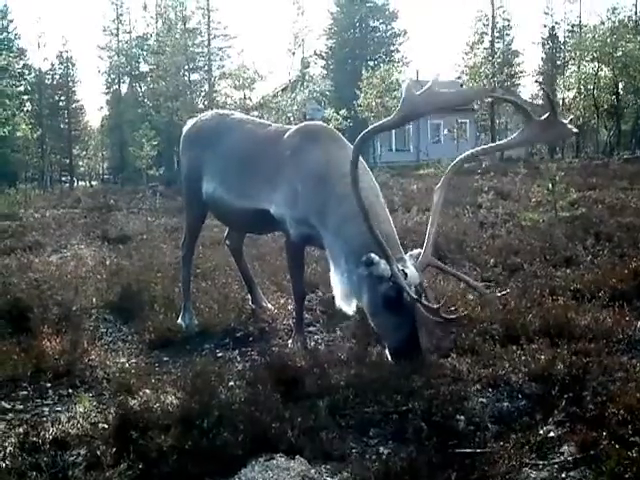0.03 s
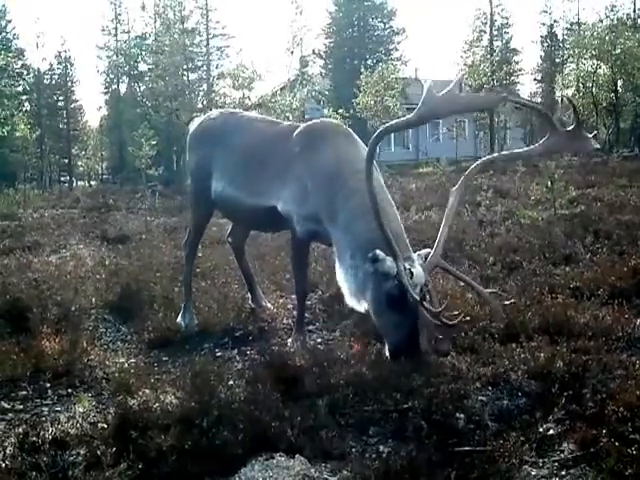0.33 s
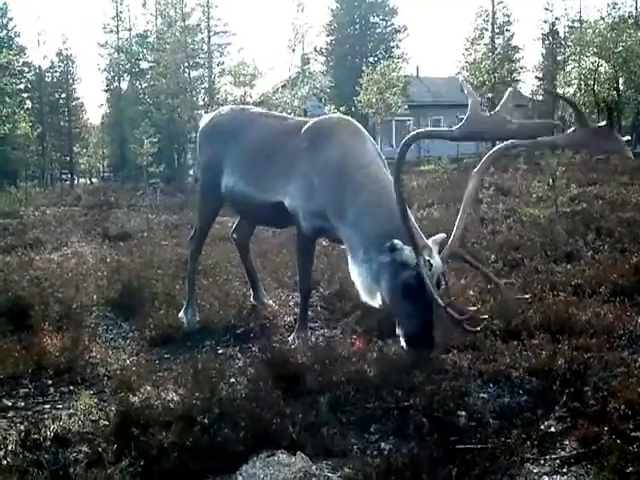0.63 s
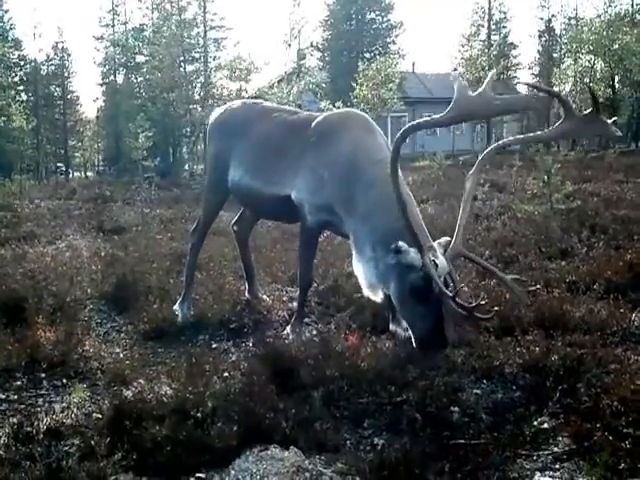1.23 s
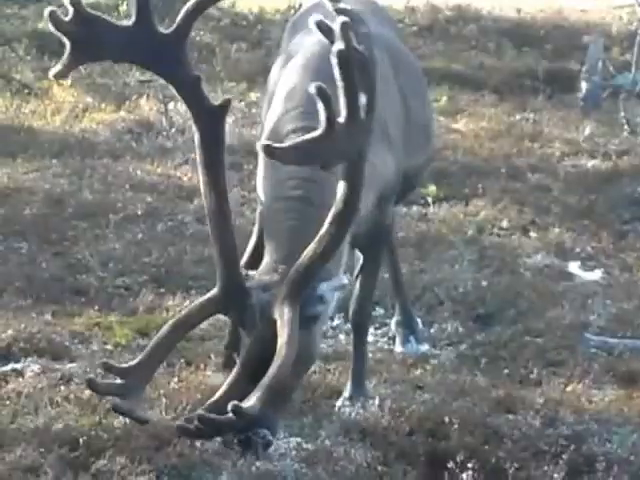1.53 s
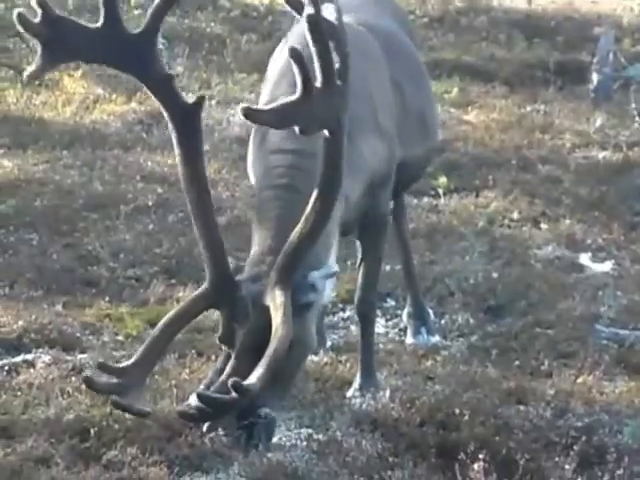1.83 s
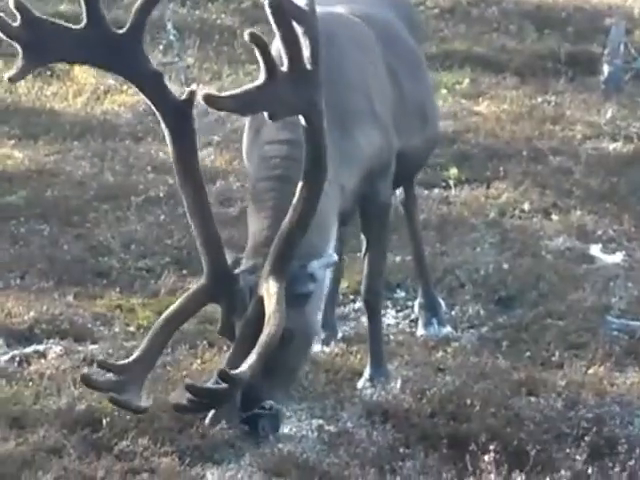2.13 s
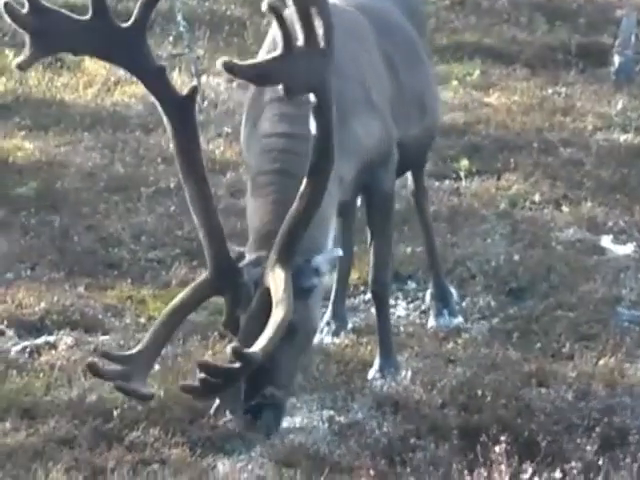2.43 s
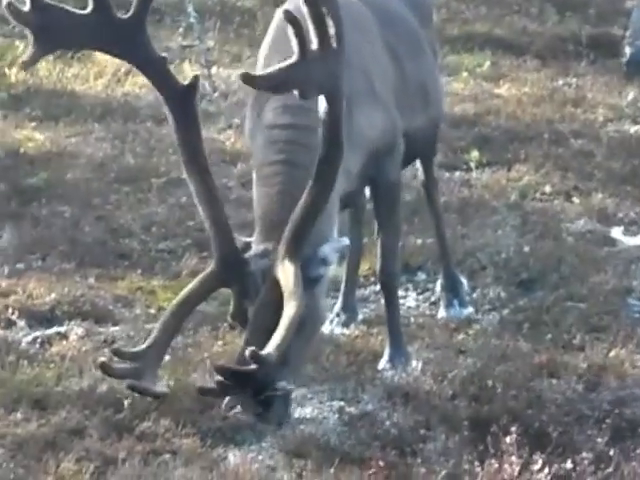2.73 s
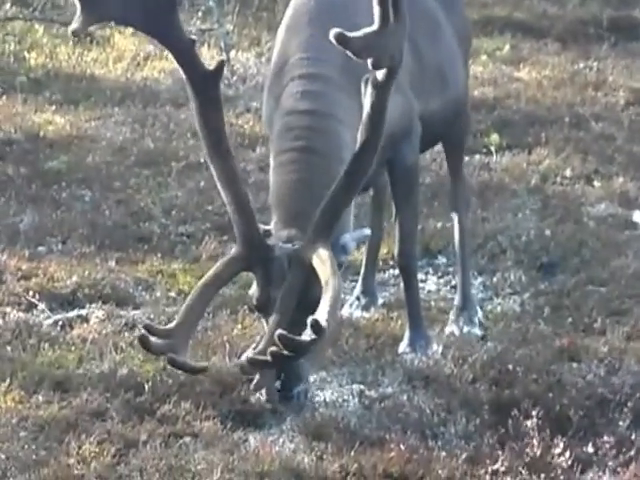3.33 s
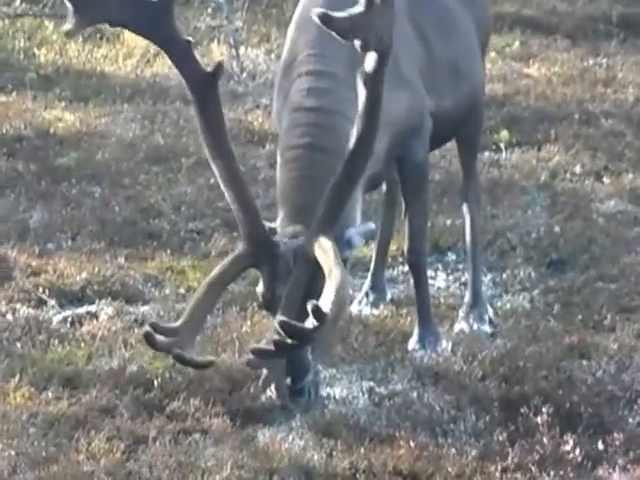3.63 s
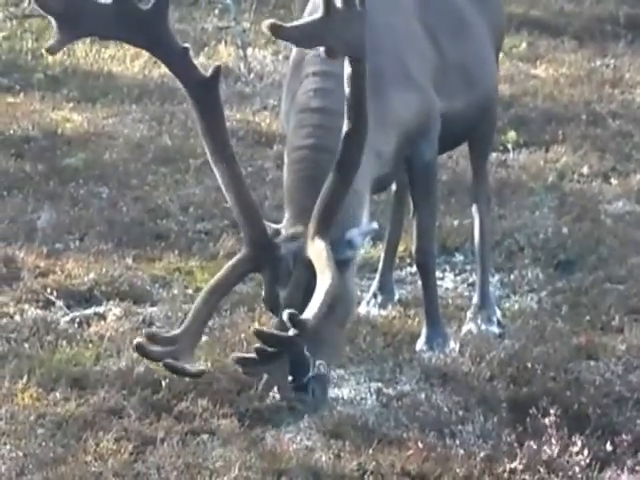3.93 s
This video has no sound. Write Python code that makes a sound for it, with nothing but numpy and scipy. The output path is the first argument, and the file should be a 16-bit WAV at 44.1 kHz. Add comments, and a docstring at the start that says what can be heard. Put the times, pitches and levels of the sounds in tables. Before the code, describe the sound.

Wind on the microphone starts faint, with a few small, sharp clicks from a reindeer grazing in the open. The sound cuts out for a moment, then low gusts buffet and thump, hardest at the end.

```python
"""A reindeer grazes on quiet heathland. At first, light air puffs against the microphone over a soft hiss
and a faint electrical whine. Four dry, sharp clicks come from the animal, probably twigs or leg tendons.
Near 1.5 seconds the sound drops out briefly and returns with a tick. Now the breeze is stronger: a low
buffeting that brightens as it swells, with faint wind in far trees. One more click comes near 2.8 seconds,
and small swirls of air (eddies) thump on the microphone, hardest at the end."""
import sys
import numpy as np
from scipy import signal
from scipy.fft import rfft, irfft
from scipy.io import wavfile
from scipy.ndimage import uniform_filter1d

SR = 44100
rng = np.random.default_rng(int(sys.argv[2]) if len(sys.argv) > 2 else 0)


def dump(signal):
    """Clip the signal to [-1, 1] and save it as 16-bit WAV at the path in sys.argv[1]."""
    limited = np.clip(np.atleast_2d(signal).T, -1, 1)
    pcm = np.round(limited * 32767).astype(np.int16)
    wavfile.write(sys.argv[1], SR, pcm)


N = 176400
T = np.arange(N) / SR

# The tone colour of five noises. Each row: frequency in Hz, relative level in dB.
HISS_SPECTRUM = [(30, 8), (200, 11.5), (400, 10.5), (700, 7), (1100, 4.5), (1800, 1), (3200, -2),
                 (7000, -4.5), (12500, -6), (15700, -10)]  # steady hiss
TREES_SPECTRUM = [(200, -12.5), (450, -4.5), (700, -5), (1000, -2), (1300, -7), (1800, -24.5), (4000, -28)]  # wind in far trees
CALM_SPECTRUM = [(10, -23.5), (35, 7.5), (70, -19), (130, -15), (250, -26), (600, -43.5)]  # light air before the break
RUMBLE_SPECTRUM = [(10, -19), (25, -0.5), (58, 2.5), (105, -1), (150, -7.5), (220, -19.5), (320, -30.5),
                   (500, -39.5), (900, -75)]  # the deep part of the gusts
FLUTTER_SPECTRUM = [(60, 10), (130, -0.5), (190, -0.5), (290, -5), (400, -19.5), (600, -27.5), (1000, -60)]  # the finer, brighter churning in the gusts
# How strong the breeze is after the break. Each row: time in seconds, rumble level in dB.
BREEZE_LEVELS = [(1.58, -36), (1.65, -35.5), (1.77, -48), (1.83, -30.5), (2.05, -49), (2.1, -32.5),
                 (2.15, -38.5), (2.44, -46), (2.45, -52.5), (2.5, -41.5), (2.66, -62.5), (2.85, -39.5),
                 (3.02, -47), (3.05, -37.5), (3.22, -58), (3.4, -43.5), (3.42, -34.5), (3.47, -35),
                 (3.52, -49), (3.62, -45.5), (3.65, -33), (3.72, -27), (3.76, -42.5), (3.82, -27),
                 (3.85, -38), (3.9, -38), (3.94, -45.5), (3.97, -30)]
# Swirls of air that hit the microphone. Each row: time of the peak in seconds, relative level in dB,
# half width in milliseconds, direction (+1 pushes, -1 sucks).
EDDY_BUMPS = [(0.037, -35.5, 1.37, -1), (0.136, -38, 1.3, -1), (.238, -35.5, 1.73, -1),
              (.268, -36.5, 1.22, -1), (0.336, -40.5, 1.3, -1), (.467, -33.5, 1.53, -1),
              (.565, -41, 1.6, -1), (0.7, -33.5, 1.83, -1), (0.7711, -40, .7, 1), (0.774, -32.5, 2.46, -1),
              (.835, -35, 1.55, -1), (.896, -29.5, 3, -1), (.935, -40, 1.2, -1), (1.007, -33.5, 5.1, -1),
              (1.038, -33, 1.76, -1), (1.134, -39.5, 1.8, -1), (1.236, -33.5, 1.47, -1),
              (1.274, -33.5, 1.05, -1), (1.372, -40.5, 2, -1), (1.667, -27, 0.96, 1), (1.826, -42, 2.2, -1),
              (1.836, -36, 0.75, 1), (1.865, -32, 0.77, 1), (1.877, -28, 1.13, 1), (2.074, -26, 1.24, -1),
              (2.0949, -19.5, 0.94, -1), (2.0996, -18, 1.1, 1), (2.104, -26, 2.2, -1),
              (2.1164, -22.5, 1.33, 1), (2.36, -30.5, 1.6, -1), (2.406, -27.5, 3.4, 1),
              (2.427, -25, 2.3, 1), (2.616, -37.5, 1.2, -1), (2.717, -33, 1.46, -1),
              (2.8322, -27, 0.68, -1), (2.8503, -29, 1, -1), (2.929, -29, 2.5, 1), (3.05, -21.5, 0.95, -1),
              (3.102, -34, 1.13, -1), (3.287, -30.5, 1.4, -1), (3.415, -26, 2.4, -1),
              (3.4253, -26.5, 0.78, 1), (3.436, -23.5, 1.07, -1), (3.463, -22.5, 0.96, 1),
              (3.719, -14.5, 0.78, -1), (3.7214, -13.5, 0.98, 1), (3.7618, -21.5, 1, 1),
              (3.7999, -23.5, 0.62, 1), (3.8132, -17, 0.63, 1), (3.8202, -12.5, 0.89, 1),
              (3.8987, -21, 1.35, 1), (3.9767, -17.5, 0.87, 1)]
# The reindeer's clicks. Each row: start in seconds, relative level in dB, pitches of rings A, B and C in Hz,
# levels of A and C against B in dB, seconds for the rings to fade by 60 dB, splinter level in dB,
# delay of the second snap in milliseconds, its level against the first in dB, low and high cutoff in Hz.
REINDEER_CLICKS = [(0.4465, -44, 3420, 5630, 4560, -5, -1.5, 0.00503, -5, 1.3, -6, 2450.0, 12100),
                   (0.9094, -36, 4100, 8720.0, 11450, -13, 2.5, 0.0057, -9, 0.93, -22, 2600, 11600.0),
                   (1.288, -37, 4580, 7360.0, 2650.0, 6.5, -4.5, 0.0046, -28, 0.302, -11.7, 2360.0, 9800),
                   (1.3661, -46, 4260.0, 5540.0, 7700, -0.5, -7, 0.0054, -16, 0.393, -5.95, 3490.0, 6470.0),
                   (2.7948, -44, 6080.0, 8600, 11800, -3, 0.616, 0.0038, -5.4, 0.3, -6, 3180.0, 12500.0)]

BREAK_START_S, BREAK_END_S = 1.465, 1.575
HISS_DB, TREES_DB, CALM_DB = -63.5, -70, -60
WHINE_HZ, WHINE_EARLY_DB, WHINE_LATE_DB = 7866, -81.5, -88
GUST_DB, FLUTTER_DB = -32.5, -46.5  # rumble and flutter in a typical gust
FLUTTER_GROWTH = 2.06  # dB more flutter for each dB more rumble
SPIKE_DB, GRIT_DB = 8.5, -6.5  # against ring B of a click
GRIT_FADE_S, SPLINTER_FADE_S = 0.00084, 0.0035


def gain(db):
    """Turn decibels into a number to multiply by."""
    return 10 ** (np.asarray(db) / 20)


def unit(x):
    """Scale a signal so its average strength (rms) is 1."""
    return x / np.sqrt(np.mean(x ** 2))


def noise(spectrum):
    """Noise of strength 1 with the tone colour of a spectrum table."""
    hz, db = np.array(spectrum).T
    freqs = np.maximum(np.fft.rfftfreq(N, 1 / SR), 1)
    colour = gain(np.interp(np.log(freqs), np.log(hz), db))
    return unit(irfft(rfft(rng.standard_normal(N)) * colour, N))


def steady(x, span_s):
    """Even out the slow swells that noise has by chance."""
    return x / np.sqrt(uniform_filter1d(x ** 2, int(span_s * SR)) + 1e-9)


def keep_band(x, side, hz, order):
    """Keep the "low" or "high" side of a frequency; a higher order cuts more steeply."""
    return signal.sosfilt(signal.butter(order, hz, side, fs=SR, output="sos"), x)


def hiss():
    """A soft, even hiss lies under the scene."""
    return gain(HISS_DB) * noise(HISS_SPECTRUM)


def electrical_whine():
    """A thin, unsteady tone fades in over 0.3 seconds and is quieter after the break."""
    drift_hz = 15 * unit(keep_band(rng.standard_normal(N), "low", hz=25, order=2))
    flicker_db = 2.5 * unit(keep_band(rng.standard_normal(N), "low", hz=25, order=2))
    tone = np.sin(2 * np.pi * np.cumsum(WHINE_HZ + drift_hz) / SR) * gain(flicker_db)
    level_db = np.where(T > BREAK_START_S, WHINE_LATE_DB, WHINE_EARLY_DB)
    fade_in = np.sqrt(np.minimum(T / 0.3, 1))
    return unit(tone) * gain(level_db) * fade_in


def far_trees():
    """After the break, wind rushes faintly through distant trees."""
    return (T > BREAK_START_S) * gain(TREES_DB) * noise(TREES_SPECTRUM)


def buffeting():
    """Air on the microphone: faint at first, then gusts whose flutter grows faster than their rumble."""
    breeze_db = np.interp(T, *np.array(BREEZE_LEVELS).T)
    flutter_db = FLUTTER_DB + FLUTTER_GROWTH * (breeze_db - GUST_DB)
    rumble = steady(noise(RUMBLE_SPECTRUM), span_s=0.0614) * gain(breeze_db)
    flutter = steady(noise(FLUTTER_SPECTRUM), span_s=0.026) * gain(flutter_db)
    calm = gain(CALM_DB) * noise(CALM_SPECTRUM)
    return np.where(T < BREAK_START_S, calm, rumble + flutter)


def eddies():
    """Each swirl of air is one smooth bump of pressure; the microphone swings back slowly after it."""
    bumps = np.zeros(N)
    for peak_s, db, half_width_ms, direction in EDDY_BUMPS:
        from_peak_ms = (T - peak_s) * 1000
        bumps += direction * gain(db) * np.exp(-0.5 * (from_peak_ms / half_width_ms) ** 2)
    return gain(-1) * keep_band(bumps, "high", hz=22, order=1)  # this filter makes the swing back


def reindeer_clicks():
    """Each click is a double snap (a spike, some grit, three short rings) with a tail of splinters."""
    out, t = np.zeros(N), T[:SR // 20]
    for (start_s, db, a_hz, b_hz, c_hz, a_db, c_db, ring_s, splinter_db,
         second_ms, second_db, low_hz, high_hz) in REINDEER_CLICKS:
        spike = gain(SPIKE_DB) * (t == 0)
        grit = gain(GRIT_DB) * rng.standard_normal(len(t)) * np.exp(-t / GRIT_FADE_S)
        rings = sum(gain(ring_db) * np.cos(2 * np.pi * hz * t)
                    for hz, ring_db in ((a_hz, a_db), (b_hz, 0), (c_hz, c_db)))
        snap = spike + grit + rings * gain(-60 * t / ring_s)
        second_snap = gain(second_db) * np.roll(snap, round(second_ms / 1000 * SR))
        splinters = gain(splinter_db) * rng.standard_normal(len(t)) * np.exp(-t / SPLINTER_FADE_S)
        click = keep_band(snap + second_snap + splinters, "high", low_hz, order=5)
        click = keep_band(click, "low", high_hz, order=3)
        start = int(start_s * SR)
        out[start:start + len(t)] += gain(db) * click
    return out


def scene():
    """All the sounds add up at one microphone."""
    return (reindeer_clicks() + eddies() + buffeting() + electrical_whine() + hiss() + far_trees())[None]


def record(dry):
    """The sound drops out for about a tenth of a second and returns with a tick; the top treble is cut."""
    sound_on = (T < BREAK_START_S) | (T > BREAK_END_S)
    tick = gain(-33) * (T > BREAK_END_S) * np.exp(-np.abs(T - BREAK_END_S) / 0.0003)
    treble_cut = signal.ellip(10, 0.1, 70, 15800, fs=SR, output="sos")  # steep, above 15800 Hz
    return signal.sosfilt(treble_cut, dry * sound_on - tick)


dry = scene()
out = record(dry)
dump(out)
```